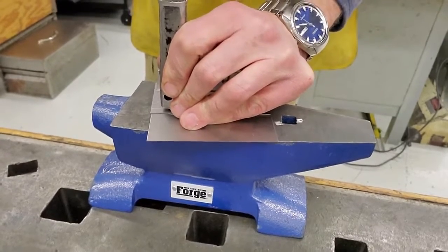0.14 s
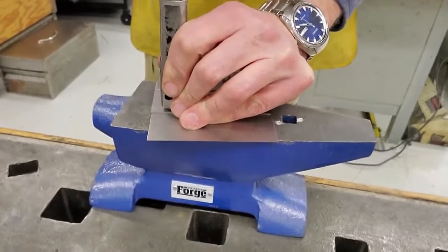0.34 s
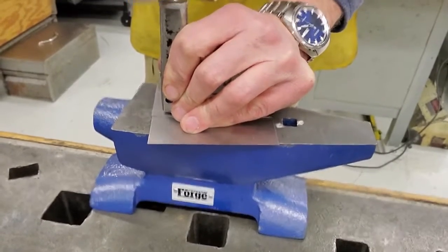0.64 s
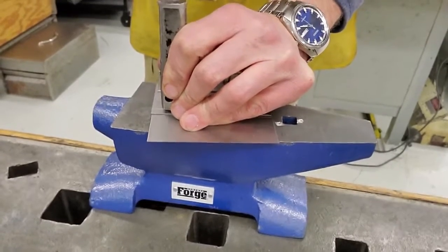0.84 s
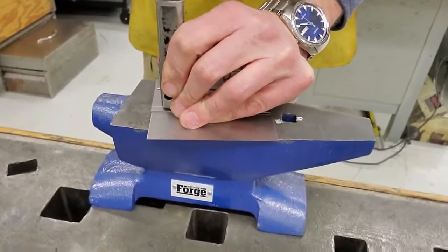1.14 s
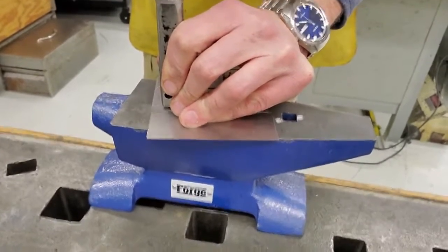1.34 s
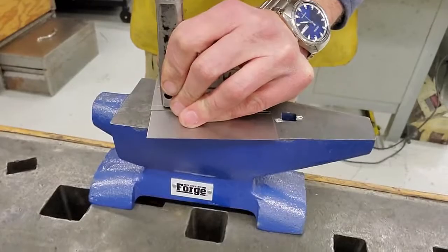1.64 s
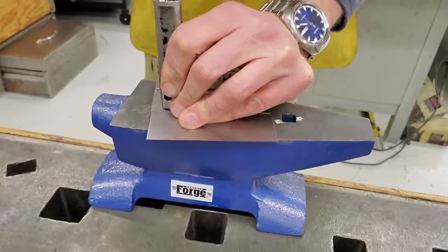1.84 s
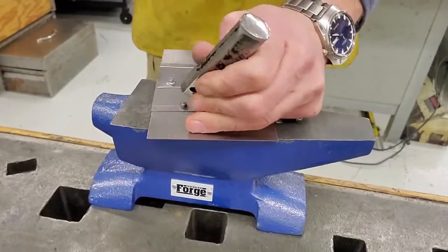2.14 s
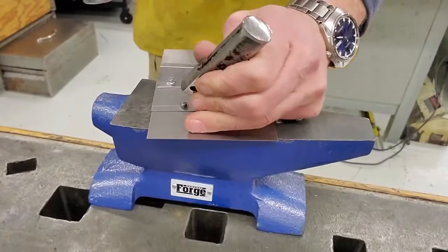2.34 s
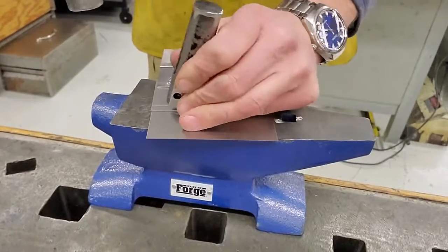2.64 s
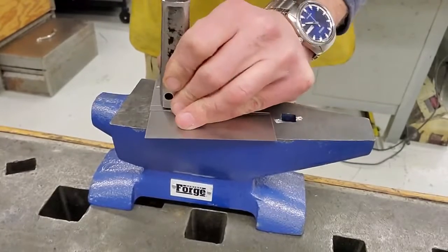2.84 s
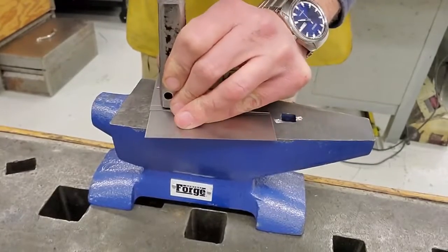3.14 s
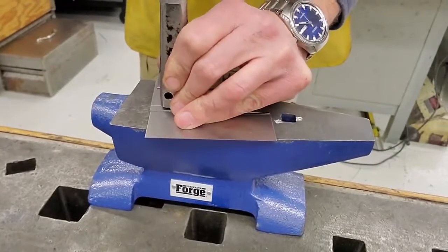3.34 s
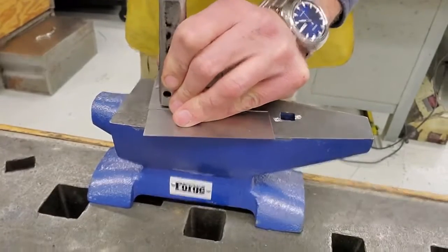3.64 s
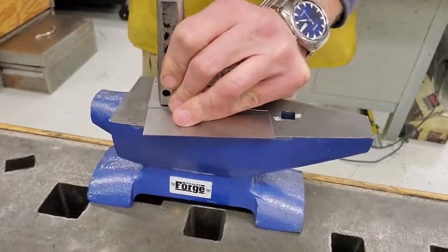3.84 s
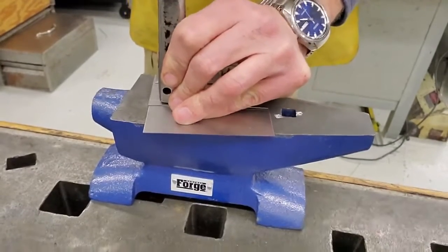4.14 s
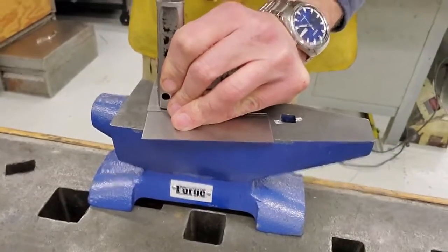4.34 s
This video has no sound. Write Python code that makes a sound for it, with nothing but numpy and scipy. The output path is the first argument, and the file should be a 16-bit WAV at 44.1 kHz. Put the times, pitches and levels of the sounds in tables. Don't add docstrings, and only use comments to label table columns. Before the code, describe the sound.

Loud, cracking metal hammer blows ring and thump a heavy bench in a reverberant workshop, pause for light clinks, then resume.

```python
import sys
import numpy as np
from scipy import signal
from scipy.fft import rfft, irfft, next_fast_len
from scipy.io import wavfile
from scipy.ndimage import map_coordinates

SR = 44100
rng = np.random.default_rng(int(sys.argv[2]) if len(sys.argv) > 2 else 0)


def voltage_ratio(level):
    return 10 ** (np.asarray(level, float) / 20)


def wrap_up_sound(samples):
    columns = np.atleast_2d(samples).T
    tamed = np.clip(columns, -1, 1)
    steps = np.round(tamed * 32767).astype(np.int16)
    wavfile.write(sys.argv[1], SR, steps)


N = 197677
LEAD = SR // 10
TOP_HZ, EDGE_HZ = 15750, 16900


def along(points, hz):
    f, v = np.transpose(points)
    return np.interp(np.log(hz + 1), np.log(f + 1), v)


def tilted(spectrum, bright_db=0):
    def gain(hz):
        octaves = np.clip(np.log2(hz / 3500 + 1e-9), 0, 1)
        return voltage_ratio(along(spectrum, hz) + bright_db * octaves) * (hz < EDGE_HZ)
    return gain


def in_band(spectrum):
    return lambda hz: tilted(spectrum)(hz) * (hz < TOP_HZ)


# (frequency [Hz], correlation [-1..1])
ALIKE = [(60, 0.91), (150, 0.98), (300, 0.79), (1000, 0.016), (2500, -0.03), (4000, -0.12), (9000, 1),
         (14000, 0.59)]
# (frequency [Hz], share [0..1])
REPEATS = [(100, 1), (1000, .8), (4000, .7), (9000, .5), (14000, .4)]


def stereo_noise(size, gain, habit=None):
    fast = next_fast_len(size)
    hz = np.fft.rfftfreq(fast, 1 / SR)
    turn = np.arccos(np.clip(along(ALIKE, hz), -1, 1)) / 2
    white = rfft(rng.standard_normal((2, fast)))
    if habit is not None:
        kept = np.sqrt(np.clip(along(REPEATS, hz), 0, 1))
        white = kept * rfft(habit[:, :fast]) + np.sqrt(1 - kept ** 2) * white
    mid, side = irfft(white * gain(hz) * [np.cos(turn), np.sin(turn)], fast)[:, :size]
    pair = np.array([mid + side, mid - side])
    return pair / np.sqrt(np.mean(pair ** 2))


def ring(modes, t, habit, attack_s, scatter_db, phase_spread, stray=.3):
    hz, db, t60_s = np.transpose(modes)[:, :, None, None]
    shape = (len(modes), 2, 1)
    strength = voltage_ratio(db + scatter_db * rng.standard_normal(shape) - 60 * t / t60_s)
    usual_phase = habit[:, :len(modes)].T[..., None]
    phase = phase_spread * (usual_phase + stray * rng.standard_normal(shape))
    tones = strength * np.sin(2 * np.pi * hz * t + phase)
    return np.sum(tones, axis=0) * (1 - np.exp(-t / attack_s))


# (frequency [Hz], density [dB per Hz])
SNAP = [(5000, -31), (8000, -1.5), (12000, 1), (15000, -2.5), (16500, -13)]


def snap(t, habit, bright_db, delay_samples=2):
    burst = stereo_noise(len(t), tilted(SNAP), habit[:, SR:])
    burst = burst * voltage_ratio(-60 * t / 0.0065) * (1 - np.exp(-(t / 0.001) ** 2))
    right = .6 * np.roll(burst[0], delay_samples) + .5 * burst[1]
    return voltage_ratio(bright_db + 4) * voltage_ratio([[3.5], [-1]]) * [burst[0], right]


# (frequency [Hz], density [dB per Hz])
HUM = [(15, -48.5), (25, -16.5), (90, -9.5), (106, -4), (126, -10), (172, -20.5), (356, -24), (411, -40.5),
       (1000, -33.5), (2070, -28), (8000, -54.5), (10400, -79), (17600, -120)]
HUM_DB, HISS_DB, HISS_STEEPER = -62, -85, 1.56
QUIET_S, QUIET_DB = 2.9, -10.5
SINK_DB_PER_S, CREEP_DB_PER_S = 3, 25


def shop():
    t = np.arange(N) / SR
    off_lowest_db = np.maximum(CREEP_DB_PER_S * (t - QUIET_S), SINK_DB_PER_S * (QUIET_S - t))
    gain_db = np.minimum(QUIET_DB + off_lowest_db, 0)
    mains = voltage_ratio(-8) * np.sin(2 * np.pi * 120.4 * t)
    hiss = (t > QUIET_S) * voltage_ratio(HISS_DB + HISS_STEEPER * gain_db) * stereo_noise(N, in_band(SNAP))
    return voltage_ratio(HUM_DB + gain_db) * (stereo_noise(N, tilted(HUM)) + mains) + hiss


# (frequency [Hz], density [dB per Hz])
SCRAPE_COLOUR = [(120, -40.5), (200, -16), (263, 5), (340, -15), (671, -3), (836, -32), (1350, -1),
                 (1590, -2.5), (3900, -4.5), (16000, -44)]
SLIDE_START_S, SLIDE_END_S, SLIDE_DB = 2.715, 2.793, -54
SETTLE_DB_PER_S, RATTLE_DB, RATTLE_END_S = 220, -84, 3.1


def scrape():
    t = np.arange(N) / SR
    grain_samples = 150
    rough = rng.standard_normal(N // grain_samples + 4)
    grain = voltage_ratio(2.5 * map_coordinates(rough, [np.arange(N) / grain_samples]))
    slide = voltage_ratio(SLIDE_DB - SETTLE_DB_PER_S * np.maximum(t - SLIDE_END_S, 0))
    slide = slide + voltage_ratio(RATTLE_DB) * (t < RATTLE_END_S)
    return (t > SLIDE_START_S) * slide * grain * stereo_noise(N, in_band(SCRAPE_COLOUR))


# (frequency [Hz], level [dB], t60 [s])
LINGER = [(1430, -6, .9), (2040, 0, 1.1), (2053, -5, .9)]


def singing():
    t = np.arange(SR) / SR
    return ring(LINGER, t, np.ones((2, 9)), attack_s=.004, scatter_db=1.5, phase_spread=.6, stray=1)


# (frequency [Hz], density [dB per Hz])
ROOM_COLOUR = [(29, -30), (50, 1.5), (122, -5), (319, -9.5), (582, -6), (740, -7.5), (1520, -7.5),
               (1800, -9.5), (1980, -9), (2350, -10.5), (5860, -15.5), (7810, -21), (11800, -16.5),
               (15700, -18.5)]
# (frequency [Hz], t60 [s])
ROOM_T60 = [(60, 0.62), (280, 1.044), (740, 1.142), (1900, 1.172), (4000, 0.92), (8000, 0.51),
            (11000, 0.44), (15000, 0.37)]


def room_tail(modes, habit, bright_db, modes_db, damping, low_hz, blur=1.6, shine_db=17):
    def colour(hz):
        peaks = 1
        for mode_hz, db, t60_s in modes:
            height = voltage_ratio(db + modes_db + shine_db * (mode_hz > 9000))
            peaks = peaks + height / (1 + ((hz - mode_hz) * t60_s / blur) ** 2)
        low_cut = hz / np.hypot(hz, low_hz)
        return tilted(ROOM_COLOUR, bright_db)(hz) * peaks * (hz < TOP_HZ) * low_cut

    noise = stereo_noise(SR * 5 // 4, colour, habit)
    hz, t, z = signal.stft(noise, SR, nperseg=512)
    decay = voltage_ratio(-60 * damping * t / along(ROOM_T60, hz)[:, None])
    tail = signal.istft(z * decay, SR, nperseg=512)[1]
    return tail * (1 - np.exp(-np.arange(tail.shape[1]) / SR / 0.0081))


# (frequency [Hz], density [dB per Hz])
CRACK = [(88, -32), (150, -4), (1160, -3.5), (1820, 3.5), (2450, -2), (3630, 3.5), (4600, -4.5), (6420, -3),
         (7370, -12), (10500, -30), (11600, -8), (14400, -6), (16500, -38.5)]
# (frequency [Hz], level [dB], t60 [s])
BENCH = [(42, -15, 0.85), (66, -4, 0.13), (80.5, 3, 0.42), (157.1, -7, .3), (245, -11, 0.25),
         (392, -9, 0.13)]


def contact(modes, loose, habit, bright_db, thump_db, room_db, crack_t60_s, ring_db, modes_db, damping,
            low_hz=10):
    tail = room_tail(modes + loose, habit, bright_db, modes_db, damping, low_hz)
    sound = voltage_ratio(room_db - 13) * tail
    t = np.arange(SR // 8) / SR
    crack = stereo_noise(len(t), tilted(CRACK, bright_db), habit[:, ::-1])
    crack = crack * voltage_ratio(-30 * t / crack_t60_s - 40 * (t / crack_t60_s) ** 2)
    crack = crack * (1 - np.exp(-(t / 0.001) ** 2))
    click = snap(t, habit, bright_db)
    steel = ring(modes, t, habit, attack_s=0.00057, scatter_db=1.2, phase_spread=1.3)
    sound[:, :len(t)] += click + crack + voltage_ratio(ring_db) * steel
    t = np.arange(SR) / SR
    thump = ring(BENCH, t, habit, attack_s=0.025, scatter_db=0.96, phase_spread=.08)
    sound[:, :SR] += voltage_ratio(thump_db - 15.5) * thump
    return sound


def add(track, sound, s):
    start = round(s * SR) + LEAD
    track[:, start:start + sound.shape[1]] += sound


# (time [s], peak [dB], brightness [dB], room [dB], pitch [Hz])
TOUCHES = [
    (2.702, -28, 0, -2, 3900),
    (2.712, -28, 6.5, 2.5, 2040),
    (2.759, -49, 3, -10, 5400),
    (2.797, -36.5, -5, -8, 1420),
    (3.38, -1.6, -8, -5, 1700),
]
# (frequency [Hz], level [dB], t60 [s])
SHEET = [(1410, 0, 0.06), (1660, -7, 0.067), (2040, -2, 0.072), (2660, -8, 0.041), (3220, -12, .03),
         (3900, 1.5, 0.021), (4430, -5, 0.033), (5320, -8, .05)]
SHEET_LOW_HZ = 700


def touches():
    track = np.zeros((2, N + 3 * SR))
    for s, db, bright_db, room_db, pitch_hz in TOUCHES:
        modes = [(hz, level_db - 8 * abs(np.log2(hz / pitch_hz)), t60_s) for hz, level_db, t60_s in SHEET]
        habit = rng.standard_normal((2, 2 * SR))
        touch = contact(modes, [], habit, bright_db, thump_db=-8, room_db=room_db - 8.5, crack_t60_s=.022,
                        ring_db=2, modes_db=15, damping=1.15, low_hz=SHEET_LOW_HZ)
        add(track, voltage_ratio(db - 8.0) * touch, s)
        add(track, voltage_ratio(db + room_db - 38) * singing(), s)
    return track[:, LEAD:LEAD + N]


# (time [s], peak [dB], brightness [dB], set ring [dB])
BLOWS = [
    (0.314, -3, 0, 4),
    (0.681, -2, 1, -4.5),
    (1.045, -2.5, 1.5, -17),
    (1.415, -2.5, 0, -1),
    (1.791, -1, 0.5, -0.5),
    (3.32, -5, 4, -1),
    (3.692, -3.5, -0.5, -11),
    (4.039, -3, -0.5, -16),
    (4.377, -2, -1.5, -7.5),
]
# (time [s], peak [dB], brightness [dB], set ring [dB])
EARLIER_BLOW = (-0.03, -2.5, -1, -2)
# (frequency [Hz], level [dB], t60 [s])
STEEL = [(488, -14.5, 0.079), (589, -14.5, 0.19), (1026, -8.5, 0.072), (1180, -15, 0.048), (1410, -23, .05),
         (1560, -3, 0.052), (2006, -6.5, 0.066), (2940, -2, 0.0089), (3535, -5, 0.027), (4075, -4.5, 0.026),
         (5100, -22, 0.034), (5990, -10.5, 0.024)]
# (frequency [Hz], level [dB], t60 [s])
SET = [(11292, -8, .09), (11790, -13, .07), (12410, -18, .14), (14200, -18, .03)]
# (frequency [Hz], level [dB], t60 [s])
UNSEATED = [(1420, 3, .05), (2040, 9, .11), (3280, 0, .015), (4010, 3, .06), (4330, 8, .01),
            (4900, 3, .015), (5490, 6, .01)]
PAUSE_S = .8
USUAL_DB, EVENED = -2.5, .8


def blows():
    track = np.zeros((2, N + 3 * SR))
    before_s = EARLIER_BLOW[0]
    seated, moved = rng.standard_normal((2, 2, 2 * SR))
    for s, db, bright_db, set_db in [EARLIER_BLOW, *BLOWS]:
        modes = STEEL + [(hz, level_db + set_db, t60_s) for hz, level_db, t60_s in SET]
        is_loose = s - before_s > PAUSE_S
        loose, habit = (UNSEATED, moved) if is_loose else ([], seated)
        body_db = EVENED * (USUAL_DB - db)
        blow = contact(modes, loose, habit, bright_db, thump_db=body_db - .4, room_db=body_db,
                       crack_t60_s=0.024, ring_db=-4.5, modes_db=1.5, damping=1.112)
        add(track, voltage_ratio(db + 2.5) * blow, s)
        if is_loose:
            add(track, voltage_ratio(db - 24) * singing(), s)
        before_s = s
    return track[:, LEAD:LEAD + N]


def scene():
    bench_work = blows() + touches() + scrape()
    return bench_work * voltage_ratio([[-.3], [.3]]) + shop()


def ducking(depth_db, quick_db, ahead_s, quick_s, slow_s):
    t, gain_db = np.arange(N) / SR, np.zeros(N)
    for s, *_ in [EARLIER_BLOW, *BLOWS]:
        since_s = np.maximum(t - s, 0)
        dip_db = depth_db * np.exp(-(since_s / slow_s) ** 2) + quick_db * np.exp(-since_s / quick_s)
        onset = np.clip((t - s + ahead_s) / 0.00084, 0, 1)
        gain_db = np.minimum(gain_db, -dip_db * onset)
    return voltage_ratio(gain_db)


def band_limit(x):
    return signal.sosfilt(signal.butter(12, 17000, fs=SR, output="sos"), x)


def record(dry):
    x = dry * ducking(depth_db=7.5, quick_db=1.0, ahead_s=0.0086, quick_s=0.036, slow_s=0.29)
    x = x / (1 + np.abs(x / .98) ** 6) ** (1 / 6)
    edge_db_per_khz = 40
    over_khz = np.maximum(np.fft.rfftfreq(N, 1 / SR) - TOP_HZ, 0) / 1000
    mix = irfft(rfft(x) * voltage_ratio(-edge_db_per_khz * over_khz), N)
    return band_limit(mix)


dry = scene()
out = record(dry)
wrap_up_sound(out)
```